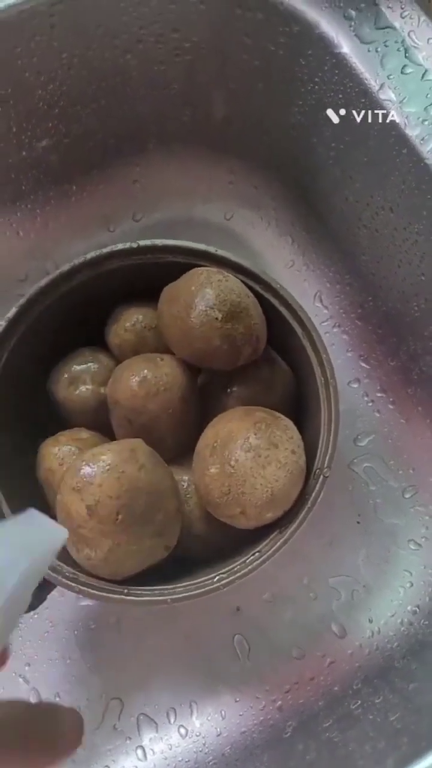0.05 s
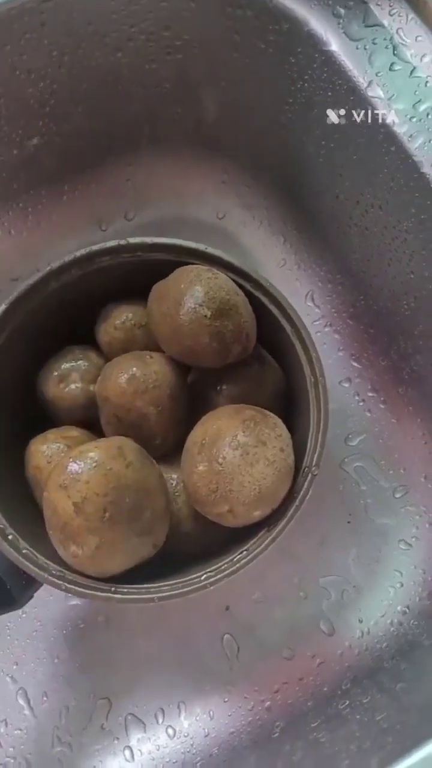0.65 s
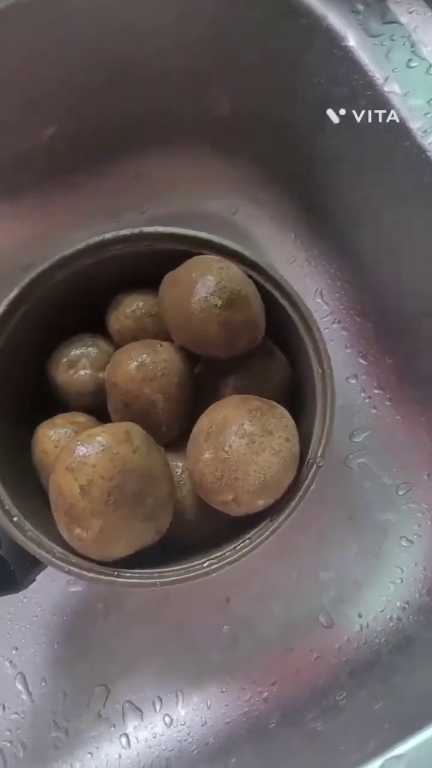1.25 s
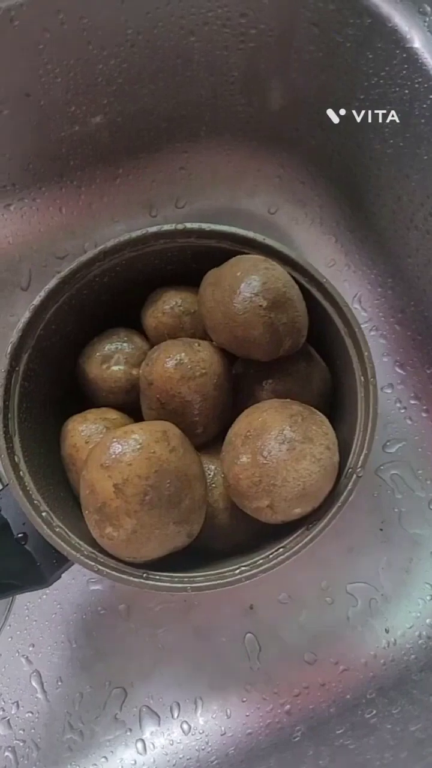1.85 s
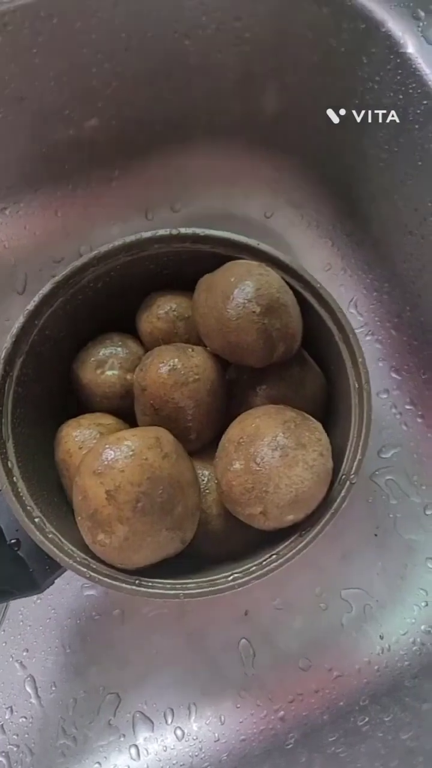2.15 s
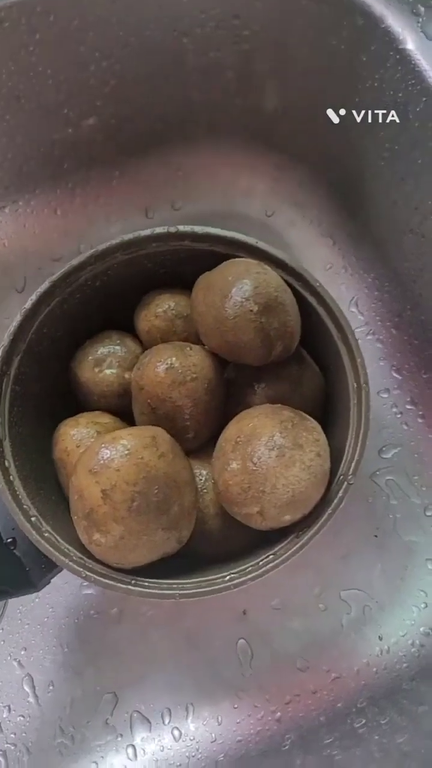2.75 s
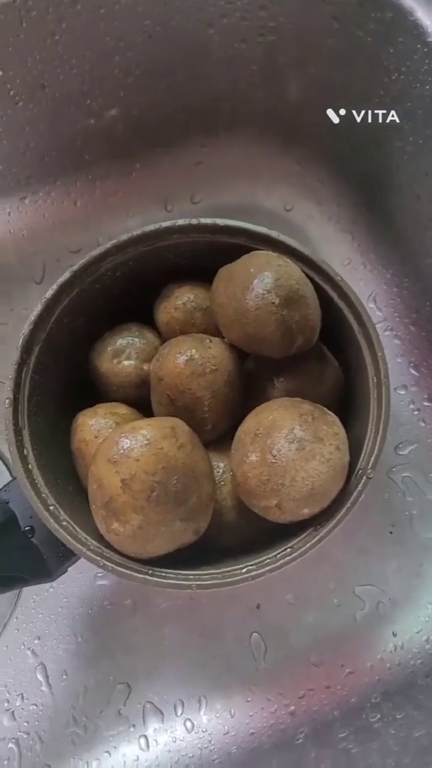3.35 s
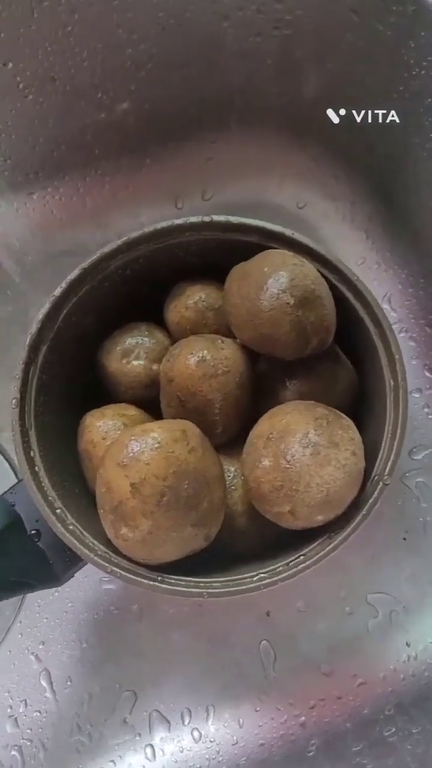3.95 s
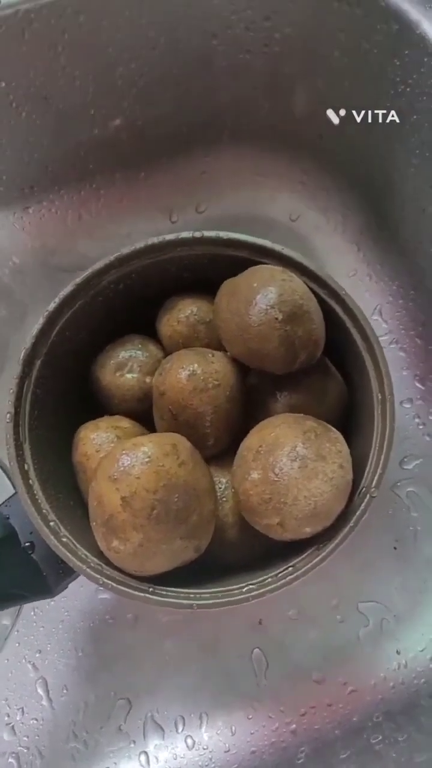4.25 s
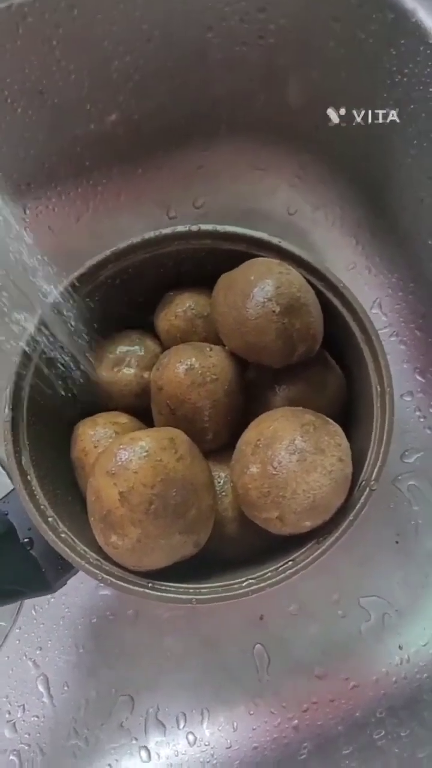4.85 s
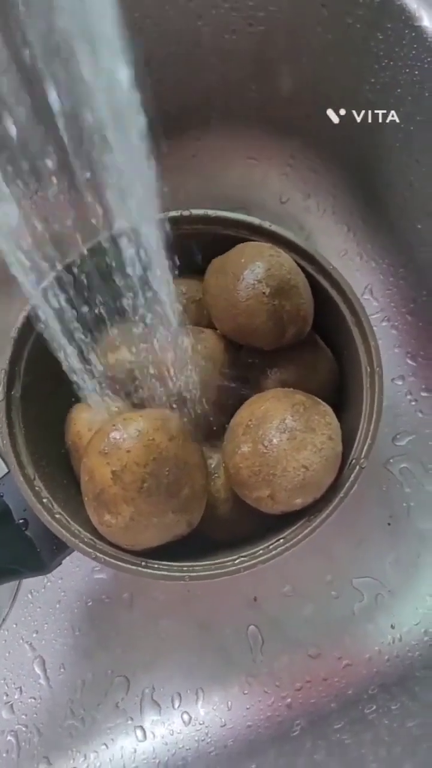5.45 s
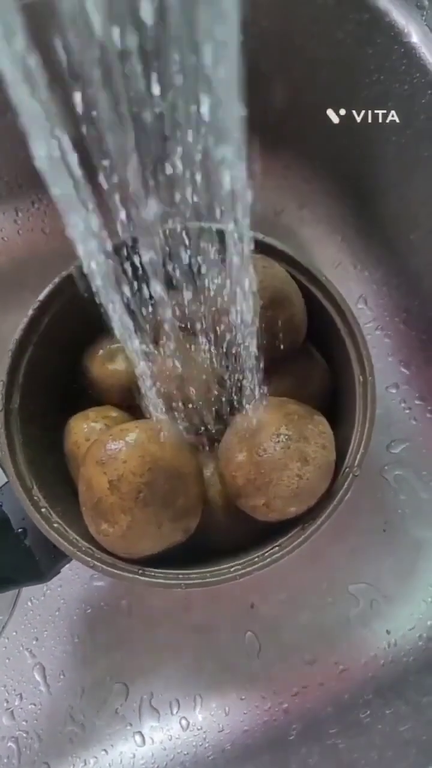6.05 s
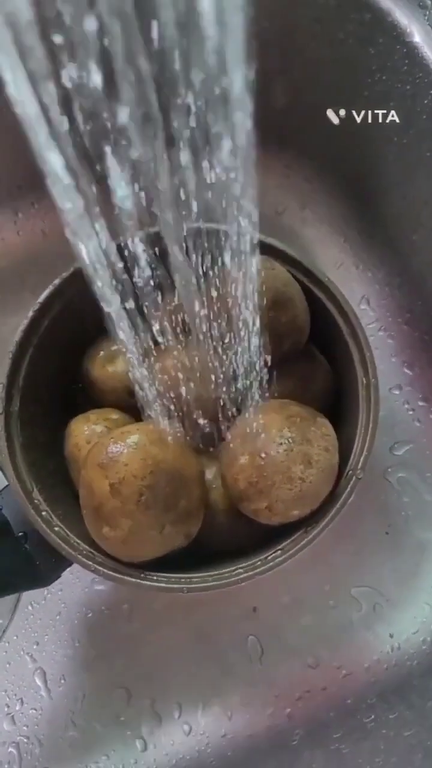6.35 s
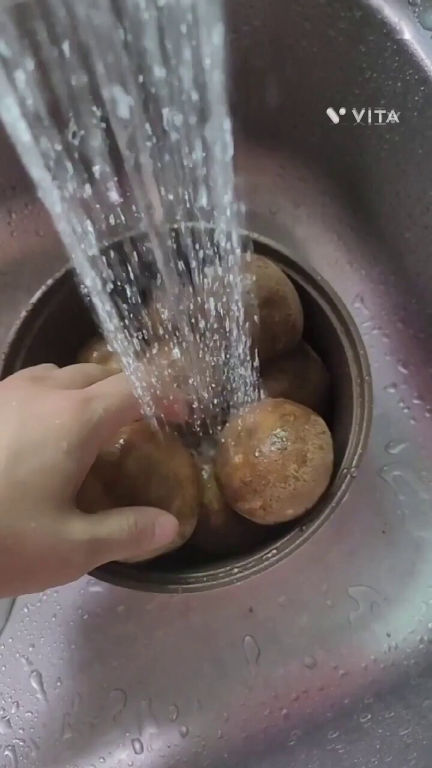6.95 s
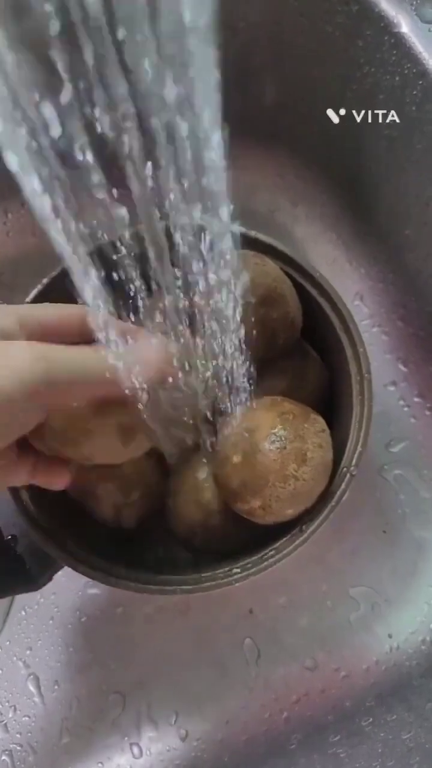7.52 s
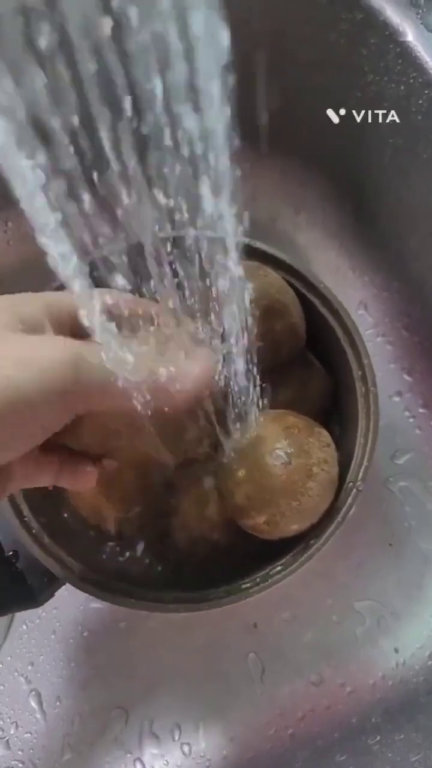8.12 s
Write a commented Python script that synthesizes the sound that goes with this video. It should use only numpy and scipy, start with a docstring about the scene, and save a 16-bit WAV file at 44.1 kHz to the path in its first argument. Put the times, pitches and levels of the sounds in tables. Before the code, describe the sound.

A spray bottle squirts three times and thuds down, then tap water drums on a steel sink and splashes over potatoes in a bowl.

```python
"""Washing potatoes in a steel sink.

A trigger bottle atomises cleaner in three squirts onto potatoes in a bowl and is put down with a thud.
The tap is handled; its jets drive the modes of the sink floor, then swing over to splash into the bowl,
where trapped air resonates as a hand turns and rubs the potatoes. Heard close, in a small kitchen."""
import sys
import numpy as np
from scipy import signal
from scipy.fft import rfft, irfft
from scipy.io import wavfile

SR = 44100
rng = np.random.default_rng(int(sys.argv[2]) if len(sys.argv) > 2 else 0)


def put_to_file(sound):
    """Save the sound as 16-bit audio at rate SR, in the file named by the first command-line argument."""
    columns = np.atleast_2d(sound).T  # one column per channel
    safe = np.clip(columns, -1, 1)
    whole_steps = np.round(safe * 32767)
    wavfile.write(sys.argv[1], SR, whole_steps.astype(np.int16))


N = 360738
TIME = np.arange(N) / SR

# Levels are relative within each layer; t60 is the time taken to decay by 60 dB.
# hiss of the landing jets, softer on potatoes than on steel: (time [s], level [dB])
JET_HISS = [(4.29, -26), (4.43, -27.5), (4.49, -28.5), (4.66, -30.5), (4.86, -27.5), (5.02, -29),
            (5.3, -29.5), (5.7, -32.5), (6.42, -40), (6.8, -37.5), (7.3, -38.5), (8.18, -36.5)]
# splashes where a jet catches a potato or the hand: (time [s], level [dB], spread [s])
THROWN_SPLASHES = [(5.77, -35, .02), (5.87, -43.5, 0.031), (6.03, -33.5, 0.014), (6.08, -35, 0.015),
                   (6.2, -37, 0.023), (6.575, -34, 0.032), (6.79, -36, 0.029), (7.16, -36, 0.0096),
                   (7.34, -34, 0.014), (7.41, -37.5, 0.011), (7.69, -36.5, .02), (7.761, -30.5, 0.011),
                   (7.87, -33.5, 0.03), (8.13, -35.5, 0.03)]
# spits where a jet first strikes or catches an edge: (time [s], level [dB], pitch [Hz], t60 [s])
JET_SPITS = [(4.278, -27, 11700, 0.0062), (4.432, -26.5, 3430, 0.079), (5.644, -36.5, 1380, 0.14),
             (5.716, -37.5, 2840, 0.33), (5.851, -31.5, 7000, .015), (5.899, -29, 7960, 0.02),
             (6.391, -38, 2040, 0.045), (6.492, -36, 3180, 0.034)]
# force of the jets on the sink floor: (time [s], level [dB])
JET_FORCE = [(4.32, -32.5), (4.42, -34.5), (5.186, -35), (5.5, -37.5)]
# slugs of water striking the sink floor: (time [s], level [dB], pitch [Hz])
WATER_SLUGS = [(4.2763, -12, 450), (4.437, -26, 190), (4.555, -30, 418), (4.593, -20, 447),
               (4.727, -19, 420), (4.867, -28.5, 405.6), (4.917, -26, 486), (5.214, -19, 430)]
# modes of the steel sink: (frequency [Hz], level [dB], t60 [s])
SINK_MODES = [(84, -25, 0.17), (171, -21, 0.12), (243, -1, 0.16), (283, -4.5, 0.065), (368, -3, 0.066),
              (401.5, -16, 0.35), (461.7, -15.5, 0.2), (530, -15, 0.054), (620, -10, 0.17),
              (745, -11, 0.09), (830, -7, 0.07), (1065, -6, 0.06), (1920, -17, 0.14)]
# air between the potatoes, retuned by the cupping hand:
# (time [s], level [dB], lower resonance [Hz], upper resonance [Hz])
AIR_GAPS = [(5.5, -41, 840, 1320), (5.85, -51.5, 860, 1280), (6.48, -51.5, 885, 1290),
            (7.04, -36, 995, 1214), (7.3, -34.5, 1006, 1210), (7.55, -39.5, 947, 1146),
            (8.18, -45.5, 960, 1120)]
# water on skins, rim and hand: (time [s], level [dB])
SKIN_WATER = [(5.5, -42.5), (5.73, -46.5), (5.86, -58), (6.55, -46), (7.3, -43), (8.18, -39)]
# pockets of air closing: (time [s], level [dB], pitch [Hz], t60 [s])
AIR_PLOPS = [(6.566, -26.5, 891, 0.091), (6.783, -32.5, 1520, .03), (6.904, -29, 1220, .03),
             (6.938, -30, 1280, .03), (7.006, -23, 1300, 0.04), (7.0135, -22, 1090, 0.039),
             (7.036, -24, 1086, 0.048), (7.072, -30, 1120, 0.036), (7.108, -30.5, 1215, 0.05),
             (7.1735, -24.5, 1170, 0.048), (7.174, -18, 2020, 0.016), (7.23, -26, 1340, 0.03),
             (7.256, -26, 1160, 0.037), (7.3605, -22, 1120, 0.029), (7.413, -28.5, 1217, 0.067),
             (7.414, -28.5, 2135, 0.043), (7.6207, -23.5, 2230, 0.042), (7.709, -30.5, 1104, 0.04),
             (7.777, -30, 2120, 0.12), (7.904, -30.5, 1070, 0.053), (8.103, -24, 2680, 0.068),
             (8.138, -28, 2870, .03), (8.153, -21, 2890, 0.023)]
# potatoes bumping the bowl: (time [s], thud level [dB], knock level [dB])
POTATO_BUMPS = [(7.379, -43, -47), (7.742, -35.5, -52), (7.846, -51, -40.5), (7.905, -37, -41)]
# pump strokes: (time of full flow [s], level [dB], swell [dB/s], hold [s], fine mist offset [dB])
PUMP_STROKES = [(0.005, -36, 904, 0.093, 3), (0.41, -31, 275, 0.045, 3.5), (0.821, -31.5, 283, 0.03, 2.5)]
# liquid and air sucked through the pump: (time [s], level [dB], pitch [Hz], length [s])
PUMP_SQUELCHES = [(0.065, -40.5, 1754, 0.047), (0.441, -39.5, 1740, 0.024), (0.527, -38.5, 1310, 0.014),
                  (0.566, -44, 1510, 0.014), (0.893, -42, 1450, 0.016), (0.938, -42.5, 2480, 0.016)]
# light contacts: (time [s], level [dB], treble tilt [dB/octave], rise [s], t60 [s])
TRIGGER_CLICKS = [(.193, -38, -7, 0.0075, 0.21), (.229, -23.5, -0.5, 0.0068, 0.084),
                  (.366, -41.5, -6, 0.0081, 0.11), (.410, -25.5, 5, 0.0015, 0.033),
                  (.5425, -28.5, -4, 0.0028, 0.085), (.759, -39, -6.5, 0.0062, 0.082),
                  (.778, -37, 20, 0.0074, 0.1), (.9156, -12.5, -0.5, 0.00024, 0.01),
                  (.919, -24, -2, 0.0037, 0.047), (.994, -51.5, -2, .001, 0.28),
                  (1.067, -47.5, -7, 0.0012, 0.087)]  # plastic trigger and pump valve
HANDLING_CLACKS = [(.635, -28, -11.5, 0.0031, 0.051), (1.432, -34.5, -2, 0.00066, 0.075),
                   (1.507, -40, -5, 0.011, 0.23), (1.572, -34, 1, 0.0017, 0.087),
                   (1.694, -39, -1, 0.0035, 0.078), (1.832, -32, 6.5, 0.0042, 0.08),
                   (2.327, -45, -8.5, 0.0083, 0.37), (2.348, -43.5, -7.5, 0.001, 0.26),
                   (2.378, -35.5, 8, 0.00086, 0.12), (2.464, -33, -4, 0.0067, 0.065),
                   (2.512, -44.5, -8, 0.0043, 0.038)]  # things handled around the sink
# blows on the sink, and at 3.65 s a faint rub: (time [s], level [dB], low cutoff [Hz], high cutoff [Hz], rattle
# weight [ratio], rocking time [s])
SINK_BLOWS = [(.636, -13.5, 55, 403, 0.11, 0), (1.505, -30.5, 299, 1840, 1.96, 0),
              (1.512, -28, 175, 597, 1.4, 0), (1.572, -32.5, 179, 860, 0.97, .1),
              (2.326, -33.5, 201, 2170, 1.3, 0), (2.350, -31.5, 160, 600, 0.76, 0),
              (2.370, -34, 186, 400, 0.33, .04), (2.414, -40.5, 400, 1710, 1.2, 0),
              (2.430, -33, 187, 450, 0.38, 0), (2.466, -36.5, 190, 328, .3, 0),
              (3.65, -57.5, 400, 740, 2.6, .04)]
# small hard parts touched: (time [s], level [dB], pitch [Hz], width over pitch [ratio])
PART_TINKS = [(2.1, -46.5, 3700, 0.7), (2.379, -42, 3560, 0.38), (2.416, -39, 1736, 0.062),
              (2.463, -36.5, 3680, 0.15), (2.508, -45, 3070, 0.14)]
# spectra of the sources: (frequency [Hz], level [dB])
SPRAY_SPECTRUM = [(88, -32.5), (150, -5), (291, -1.5), (398, -11), (466, -2.5), (545, -15), (1120, -12),
                  (1310, -3.5), (1450, -5.5), (2870, -10.5), (3700, -10.5), (6770, -2.5), (9260, -4.5),
                  (11700, 3), (16000, 2)]  # droplets of the shower
STEEL_SPECTRUM = [(30, -37), (60, -3), (110, 0.5), (170, -17.5), (230, 5.5), (295, 2), (380, 8.5),
                  (540, 2.5), (630, 5.5), (790, -1.5), (890, -7), (1040, -0.5), (1500, -6.5), (2300, -14),
                  (3300, -24)]  # sink floor under the jets
SPLATTER_SPECTRUM = [(900, -37), (1850, -9.5), (2170, 11.5), (2450, -7.5), (2750, 7.5), (3400, -5.5),
                     (4600, 2.5), (9000, -39)]  # drops on potato skins
WALL_SPECTRUM = [(110, -25), (190, 0.5), (260, -6.5), (370, -13), (470, 0), (560, -12.5), (900, -26)]  # drops on the bowl
BUMP_SPECTRUM = [(60, -24), (200, -23), (330, -18), (470, -2), (700, -5), (1100, -19), (2500, -45)]  # a potato against the bowl
COARSE_MIST_SPECTRUM = [(240, -15), (400, -16.5), (1230, -2.5), (1460, -13), (1730, -6.5), (2470, -7),
                        (3690, -3), (4380, -5.5), (6640, 0), (10500, -8), (12100, 1.5), (13500, -7),
                        (15000, 3), (16000, -12)]  # nozzle throughout a stroke
FINE_MIST_SPECTRUM = [(5000, -34), (10500, -4), (12500, -3), (15000, 5), (16000, -14)]  # nozzle at full pressure
TRIGGER_SPECTRUM = [(300, -17), (750, -11.5), (1200, -0.5), (1700, -6), (2300, 1), (4200, -3.5),
                    (6600, 3.5), (7400, 6), (9200, -3.5), (12300, 6), (15000, 1.5), (16000, -5)]  # plastic pump parts
CLACK_SPECTRUM = [(350, -40), (600, 0), (1030, -8), (1350, 1), (1490, -4.5), (2090, -3.5), (2400, -7.5),
                  (2870, -3.5), (5950, 0), (7830, 6), (9240, -2), (11200, -1), (16000, -9)]  # handled things
RATTLE_SPECTRUM = [(30, -25), (80, 17.5), (160, 19), (250, -0.5), (400, 2.5), (560, -7.5), (850, 1),
                   (1400, -17), (1850, 1.5), (2500, -1.5), (3500, 1.5), (16000, -10)]  # things standing on the sink
HOUSE_SPECTRUM = [(25, -26), (70, -2.5), (108, -10.5), (249, -15), (326, -19), (489, -15.5), (962, -21),
                  (1400, -23.5), (3430, -31), (6050, -25), (9320, -34.5), (16000, -31.5)]  # background noise
# stereo widths: (frequency [Hz], side relative to mid [dB])
WATER_SIDE = [(100, -36), (270, -16), (430, 1), (560, 3.5), (700, -0.5), (880, 9), (1200, 1.5), (1600, 5.5),
              (2150, 1), (2800, 1), (6000, -0.5), (10000, -4.5)]
STEEL_SIDE = [(130, -37), (270, -7), (420, -5), (550, 8), (850, 11), (1050, -1), (2600, 7.5)]
MIST_SIDE = [(130, -10), (500, 3), (800, 3), (1500, 4), (3000, 3), (6000, -1), (12000, -6)]
HANDLING_SIDE = [(130, -16), (250, -13.5), (450, -2), (800, -2.5), (1500, 2), (5000, 0), (12000, -13.5)]
HOUSE_SIDE = [(60, -16), (200, -9), (380, -0.5), (700, 7.5), (1290, 4), (4400, 1.5), (8120, -11),
              (15000, -24)]
# reverberation of the kitchen: (frequency [Hz], t60 [s])
ROOM_DECAY = [(100, 0.23), (500, 0.26), (2000, 0.22), (8000, 0.23), (16000, 0.19)]

TAP_OPEN_S, LAND_S, LEAVE_STEEL_S = 4.149, 4.279, 5.5
BAND_LIMIT_HZ = 16000


def shower():
    """Impact noise: jets hiss in air, then land as clumps of droplets; the parts add in power."""
    fine = drops(per_s=13000, spread_db=3.5, t60=0.014, direct=0.67)
    coarse = drops(per_s=7000, spread_db=4.0, t60=0.015, direct=0.48)
    ringing = gain_of(-4) * pings(low_hz=2503, high_hz=15440, per_s=1200, cycles=1400)
    spatter = gain_of(-8.5) * drops(per_s=500, spread_db=3.5, t60=0.003, direct=1.6)
    on_bowl = np.clip((TIME - 5.0) / 0.92, 0, 1)  # the jets swing from flat steel to round potatoes
    clumps = gain_of((1.45 + 0.3 * on_bowl) * wander(1.2, 19))
    spray = (fine * np.sqrt(1 - on_bowl) + coarse * np.sqrt(on_bowl) + ringing + spatter) * clumps
    spray = colour(flicker(spray, depth_db=3.3, span_hz=280, span_s=0.024), SPRAY_SPECTRUM)
    puff = gain_of(-36.5) * np.exp(-since(TAP_OPEN_S) / 0.03)
    in_air = swell(TAP_OPEN_S, rise_s=0.005) * (gain_of(-39) + puff) * (TIME < LAND_S)
    landed = level(JET_HISS) * landing()
    thrown = sum(gain_of(db) * np.exp(-((TIME - s) / spread) ** 2 / 2)
                 for s, db, spread in THROWN_SPLASHES)
    spray *= np.sqrt(in_air ** 2 + landed ** 2 + thrown ** 2)
    for s, db, hz, t60 in JET_SPITS:
        lead, spit = slap(hz, t60)
        add(spray, s - lead, gain_of(db) * spit)
    return place(spray, WATER_SIDE, pan_db=-1.6 + 2.0 * on_bowl)


def landing(surge_db=4.5, surge_s=0.0081):
    """Onset transient: the first slug of water hits hardest, then the jets run evenly."""
    return swell(LAND_S, rise_s=0.007) * gain_of(surge_db * np.exp(-since(LAND_S) / surge_s))


def pings(low_hz, high_hz, per_s, cycles):
    """Damped oscillation: each droplet rings for 10 ms at a pitch set by its size."""
    length = SR // 100
    t = np.arange(length) / SR
    onset, size, strength, mid_phase, side_phase = rng.random((int(per_s * N / SR), 5)).T[:, :, None]
    hz = low_hz * (high_hz / low_hz) ** size
    envelope = (strength + 0.12) ** -.5 * np.exp(-np.log(1000) * t * hz / cycles) * np.sqrt(hz)
    samples = ((onset * N).astype(int) + np.arange(length)).ravel()
    rings = (envelope * np.sin(2 * np.pi * (hz * t + phase)) for phase in (mid_phase, side_phase))
    return unit_rms(np.array([np.bincount(samples, ring.ravel(), N)[:N] for ring in rings]))


def drumming(leave_db_per_s=142):
    """Forced vibration of a plate: the sink floor roars and rings until the jets swing off it."""
    beats = drops(per_s=1800, spread_db=2.5, t60=0.031, direct=0.79)
    ring = unit_rms(signal.oaconvolve(beats, sink_ring()[:1], axes=1)[:, :N])
    roar = gain_of(1) * colour(beats, STEEL_SPECTRUM) + gain_of(-10) * ring
    force = landing() * level(JET_FORCE) * gain_of(-leave_db_per_s * since(LEAVE_STEEL_S))
    surges = gain_of(1.2 * wander(5.8, 18))
    return place(roar * force * surges, STEEL_SIDE, pan_db=-1.0)


def slugs(ring_db=-13):
    """Impulsive excitation: thick slugs of water briefly dent the sink floor and leave it ringing."""
    out = np.zeros((2, N))
    for s, db, hz in WATER_SLUGS:
        push = thump(hz, rise_s=0.0014)
        ring = signal.oaconvolve(sink_ring(), push[:1], axes=1)
        add(out, s, gain_of(db) * push)
        add(out, s, gain_of(db + ring_db) * ring / abs(ring).max())
    return place(out, STEEL_SIDE, pan_db=-1.0)


def sink_ring(uneven_db=2.0, detune=0.032):
    """Modal superposition: the steel's decaying modes vary with the spot struck and the load."""
    t = np.arange(SR // 2) / SR
    ring = np.zeros((2, len(t)))
    for hz, db, t60 in SINK_MODES:
        weight, shift, lag = rng.uniform(-1.06, 1, 3)
        phase = np.array([[0], [np.sign(lag) * np.pi / 2]])  # side in quadrature with mid
        envelope = gain_of(db + uneven_db * weight - 60 * t / t60)
        ring += envelope * np.sin(2 * np.pi * hz * (1 + detune * shift) * t + phase)
    return ring


def bowl():
    """Impact and resonance: water gurgles between the potatoes, froths on them and drums on the bowl."""
    hollow = cavities()
    hollow += gain_of(-10) * bubbles(low_hz=973, high_hz=1357, per_s=70, cycles=69, count=12)
    skin_drops = drops(per_s=600, spread_db=4.0, t60=0.034, direct=0.67)
    froth = bubbles(low_hz=1950, high_hz=3300, per_s=110, cycles=110, count=18)
    wall_drops = drops(per_s=600, spread_db=5.5, t60=0.0087, direct=0.41)
    splatter = gain_of(-4) * colour(skin_drops, SPLATTER_SPECTRUM) + gain_of(-6) * froth
    splatter += gain_of(-13.5) * colour(wall_drops, WALL_SPECTRUM)
    water = place(hollow * level([row[:2] for row in AIR_GAPS]), WATER_SIDE, pan_db=2.0)
    water += place(splatter * level(SKIN_WATER), WATER_SIDE, pan_db=1.5)
    return water * swell(LEAVE_STEEL_S, rise_s=0.18)


def cavities():
    """Cavity resonance: drops excite two modes of the air between the potatoes."""
    s, _, lower_hz, upper_hz = np.transpose(AIR_GAPS)
    patter = drops(per_s=410, spread_db=4.0, t60=0.03, direct=1.0)
    lower = resonate(patter, np.interp(TIME, s, lower_hz), width_hz=113)
    upper = resonate(patter, np.interp(TIME, s, upper_hz), width_hz=157)
    return gain_of(-11.5) * lower + gain_of(-9.5) * upper


def bubbles(low_hz, high_hz, per_s, cycles, count):
    """Superposition: bubbles of many sizes form at random, each ringing at its own pitch."""
    pitches = np.geomspace(low_hz, high_hz, count) * rng.uniform(1.0, 1.03, count)
    births = [impacts(per_s / count, spread_db=3.8) for _ in pitches]
    rings = [bubble(hz, cycles / hz, glide=0.065) for hz in pitches]
    return unit_rms(sum(signal.oaconvolve(born[None], ring, axes=1)[:, :N]
                        for born, ring in zip(births, rings)))


def bubble(hz, t60, glide):
    """Volume oscillation: a pocket of air rings, decays and rises in pitch."""
    t = np.arange(SR // 8) / SR
    turns = hz * t * (1 + glide * np.minimum(t / t60, 1))
    phase = 2 * np.pi * rng.random() + np.array([[0], [rng.choice([-1, 1]) * np.pi / 2]])  # mid, side
    return gain_of(-60 * t / t60) * (1 - np.exp(-t * hz * 2)) * np.sin(2 * np.pi * turns + phase)


def hand():
    """Air entrapment: a turned potato closes pockets that plop with a wet slap, and bumps the bowl."""
    out = np.zeros((2, N))
    for s, db, hz, t60 in AIR_PLOPS:
        lead, splat = slap(hz, t60)
        add(out, s - lead, gain_of(db - 13) * splat)
        add(out, s, gain_of(db + 1) * bubble(hz, t60, glide=0.047))
    for s, thud_db, knock_db in POTATO_BUMPS:
        lead, knock = burst(rise_s=0.0044, t60=0.16)
        add(out, s - lead, gain_of(knock_db) * colour(knock, BUMP_SPECTRUM))
        add(out, s, gain_of(thud_db) * thump(hz=70, rise_s=0.011))
    return place(out, WATER_SIDE)


def mist(empty_db_per_s=243, fine_fall_s=0.043):
    """Atomisation: the nozzle tears liquid into droplets, finest at full pressure, as the pump empties."""
    flow, pressure = np.zeros(N), np.zeros(N)
    for s, db, swell_db_per_s, hold, fine_db in PUMP_STROKES:
        flow += gain_of(db + swell_db_per_s * np.minimum(TIME - s, 0) - empty_db_per_s * since(s + hold))
        pressure += gain_of(db + fine_db) * swell(s, rise_s=0.0018) * np.exp(-since(s) / fine_fall_s)
    coarse = drops(per_s=20000, spread_db=4.0, t60=0.0093, direct=0.65)
    coarse = colour(flicker(coarse, depth_db=3.8, span_hz=300, span_s=0.021), COARSE_MIST_SPECTRUM)
    fine = colour(drops(per_s=14000, spread_db=4.0, t60=0.0097, direct=0.61), FINE_MIST_SPECTRUM)
    return place(gain_of(-2) * coarse * flow + gain_of(0.5) * fine * pressure, MIST_SIDE)


def squelches(scatter_octaves=0.33, count=8):
    """Bubble resonance: air sucked through the pump rings in quick clusters."""
    out = np.zeros((2, N))
    for s, db, hz, length in PUMP_SQUELCHES:
        pitches = hz * 2 ** (scatter_octaves * rng.permutation(np.linspace(-1, 1, count)))
        delays = length * (np.arange(count) + rng.random(count)) / count
        for delay, pitch in zip(delays, pitches):
            add(out, s + delay, gain_of(db) * bubble(pitch, t60=0.056, glide=0.0054))
    return place(out, HANDLING_SIDE)


def knocks(rock_gap_s=0.041, rock_db_per_s=99, max_rocks=4):
    """Impact and rebound: things strike the sink, and some rock on in softer, weaker blows."""
    out, ring = np.zeros((2, N)), gain_of(-2) * sink_ring()
    for s, db, low_hz, high_hz, rattle_weight, rocking_s in SINK_BLOWS:
        lead, first = blow(ring, low_hz, high_hz, rattle_weight)
        add(out, s - lead, gain_of(db) * first)
        delays = rock_gap_s * (1 + np.arange(max_rocks) + rng.uniform(-0.18, 0.17, max_rocks))
        for delay in delays[delays < rocking_s]:
            lead, again = blow(ring, low_hz, high_hz=580, rattle_weight=0.83)
            add(out, s + delay - lead, gain_of(db - rock_db_per_s * delay) * again)
    return place(out, HANDLING_SIDE)


def blow(ring, low_hz, high_hz, rattle_weight):
    """Contact filtering of ring and rattle: weight reaches the low modes, hardness the high ones."""
    contact = signal.butter(3, [min(low_hz, .8 * high_hz), high_hz], "bandpass", fs=SR)
    lead, noise = burst(rise_s=0.001, t60=0.024)
    rattle = unit_rms(signal.lfilter(*contact, colour(noise, RATTLE_SPECTRUM)))
    out = np.zeros((2, SR))
    add(out, 0, rattle_weight * gain_of(-18) * rattle)
    add(out, lead, signal.lfilter(*contact, ring))
    return lead, out


def clicks(contacts, spectrum, pan_db):
    """Source and filter: short scrapes end in a snap, coloured by the part that is struck."""
    out = np.zeros((2, N))
    for s, db, tilt_db, rise_s, t60 in contacts:
        lead, snap = burst(rise_s, t60)
        add(out, s - lead, gain_of(db) * colour(snap, spectrum, tilt_db))
    return place(out, HANDLING_SIDE, pan_db)


def tinks():
    """Free vibration: small hard parts ring briefly in one resonance when touched."""
    out = np.zeros((2, N))
    for s, db, hz, width in PART_TINKS:
        lead, noise = burst(rise_s=0.0011, t60=0.053)
        peak = [(hz / 2, -40), (hz / (1 + width), -18), (hz, 0), (hz * (1 + width), -18), (hz * 2, -40)]
        add(out, s - lead, gain_of(db) * colour(noise, peak))
    return place(out, HANDLING_SIDE)


def kitchen(x):
    """Reverberation: a short diffuse tail, each band decaying at its own rate."""
    hz, t, bands = signal.stft(rng.standard_normal((2, SR // 2)), SR, nperseg=256)
    envelope = gain_of(-60 * t / curve_at(ROOM_DECAY, hz)[:, None]) * (1 - np.exp(-t / 0.00048))
    tail = place(signal.istft(bands * envelope, SR, nperseg=256)[1], HANDLING_SIDE)
    return signal.fftconvolve(x, tail / np.linalg.norm(tail[0]), axes=1)[:, :N]


def background():
    """Stationary noise: the steady low sound of the house."""
    return gain_of(-59) * place(colour(rng.standard_normal((2, N)), HOUSE_SPECTRUM), HOUSE_SIDE)


def impacts(per_s, spread_db):
    """Shot noise: random impulses, many small and a few large."""
    return (rng.random(N) < per_s / SR) * gain_of(spread_db * np.minimum(rng.exponential(1, N), 4.5))


def drops(per_s, spread_db, t60, direct):
    """Scattering: each drop gives a direct snap, then brief reflections off the sink walls."""
    hits = impacts(per_s, spread_db)
    retained = gain_of(-120 / (t60 * SR))  # share of energy left after one sample
    energy = signal.lfilter([1 - retained], [1, -retained], hits ** 2)
    scatter = np.sqrt(energy) * rng.standard_normal((2, N))
    return unit_rms(direct * hits * rng.choice([-1, 1], (2, N)) + scatter)


def burst(rise_s, t60, lead=0.05):
    """Exponential growth and decay of noise; returns the seconds before its peak, and the sound."""
    t = np.arange(SR // 3) / SR - lead
    envelope = np.exp(np.minimum(t, 0) / rise_s) * gain_of(-60 * np.maximum(t, 0) / t60)
    return lead, envelope * rng.standard_normal((2, len(t)))


def slap(hz, t60):
    """Broad resonance: a sharp burst in one wide band makes a wet slap."""
    lead, noise = burst(rise_s=0.00026, t60=t60)
    return lead, colour(noise, [(hz / 3, -30), (hz / 1.3, -8), (hz, 0), (hz * 1.3, -8), (hz * 3, -30)])


def thump(hz, rise_s):
    """Heavy damping: a soft push gives a few swings, in the mid channel alone."""
    t = np.arange(SR // 4) / SR
    return t / rise_s * np.exp(1 - t / rise_s) * np.sin(2 * np.pi * hz * t) * np.array([[1], [0]])


def resonate(x, hz, width_hz):
    """Heterodyne filtering: a steep resonance follows a pitch curve."""
    carrier = np.exp(2j * np.pi * np.cumsum(hz) / SR)
    pole = np.exp(-np.pi * width_hz / SR)
    return unit_rms((carrier * signal.lfilter([1], np.poly([pole, pole]), x / carrier)).real)


def flicker(x, depth_db, span_hz, span_s):
    """Spectral modulation: the colour shifts at random, in patches of this width and length."""
    frames = dict(fs=SR, nperseg=512, noverlap=384)
    bands = signal.stft(x, **frames)[2]
    field = rng.standard_normal(bands.shape[1:])
    for axis, steps in enumerate([span_hz * 512 / SR, span_s * SR / 128]):
        window = np.expand_dims(signal.windows.gaussian(61, steps / 2), 1 - axis)
        field = signal.oaconvolve(field, window, "same")
    bands *= gain_of(depth_db * np.minimum(unit_rms(field), 1.5))
    return unit_rms(signal.istft(bands, **frames)[1][:, :N])


def wander(low_hz, high_hz):
    """Band-limited noise: a random drift of unit size between these rates."""
    hz = np.fft.rfftfreq(N, 1 / SR) + 1e-9
    spectrum = rfft(rng.standard_normal(N)) / (1 + (hz / high_hz) ** 2) / (1 + (low_hz / hz) ** 2)
    return unit_rms(irfft(spectrum, N))


def colour(x, spectrum, tilt_db=0, keep_power=True):
    """Minimum-phase filtering to a spectrum, tilted by tilt_db per octave above 1200 Hz."""
    hz = abs(np.fft.fftfreq(4096, 1 / SR))
    gain = gain_of(curve_at(spectrum, hz) + tilt_db * np.log2(np.clip(hz, 1200, None) / SR))
    if keep_power:  # of white noise
        gain = unit_rms(gain * np.where(hz < BAND_LIMIT_HZ + 500, 1, .03))
    response = np.exp(np.conj(signal.hilbert(np.log(gain + 1e-6))))
    taps = np.fft.ifft(response).real[:len(hz) // 2]
    return signal.oaconvolve(x, taps.reshape((1,) * (x.ndim - 1) + (-1,)), axes=-1)[..., :x.shape[-1]]


def place(pair, width, pan_db=0):
    """Sum and difference: mid and side become left and right; positive pan favours the left."""
    mid, side = pair[0], colour(pair[1], width, keep_power=False)
    return np.array([(mid + side) * gain_of(pan_db / 2), (mid - side) * gain_of(-pan_db / 2)])


def curve_at(points, hz):
    """Linear interpolation over log frequency."""
    known_hz, values = np.transpose(points)
    return np.interp(np.log(hz + 1), np.log(np.sort(known_hz) + 1), values)


def level(rows):
    """Amplitude envelope from a dB curve, holding its end values."""
    s, db = np.transpose(rows)
    return gain_of(np.interp(TIME, np.sort(s), db))


def swell(s, rise_s):
    """Exponential growth that reaches 1 at time s and stays there."""
    return np.exp(np.minimum(TIME - s, 0) / rise_s)


def since(s):
    """Seconds elapsed since time s, zero before it."""
    return np.maximum(TIME - s, 0)


def add(mix, s, sound):
    """Superposition of a sound on the mix from time s."""
    part = mix[:, max(round(s * SR), 0):][:, :sound.shape[1]]
    part += sound[:, :part.shape[1]]


def gain_of(db):
    """Amplitude ratio of a level in decibels."""
    return 10 ** (np.asarray(db) / 20)


def unit_rms(x):
    """Normalisation to unit mean power."""
    return x / np.sqrt(np.mean(x ** 2) + 1e-20)


def scene():
    """Superposition of direct sound, reverberation and background noise."""
    bottle = mist() + squelches() + clicks(TRIGGER_CLICKS, TRIGGER_SPECTRUM, pan_db=-1.0)
    clacks = clicks(HANDLING_CLACKS, CLACK_SPECTRUM, pan_db=-2.0) + tinks()
    blows = knocks()
    water = shower() + drumming() + slugs() + bowl()
    potatoes = hand()
    to_room = gain_of(-11.5) * bottle + gain_of(-6.5) * clacks + gain_of(-4) * blows
    to_room += gain_of(-8) * water + gain_of(-16) * potatoes
    return bottle + clacks + blows + water + potatoes + kitchen(to_room) + background()


def record(dry):
    """Band limiting: a steep low-pass filter removes the highest treble."""
    taps = signal.firwin(511, BAND_LIMIT_HZ, window=("kaiser", 9), fs=SR)
    return signal.oaconvolve(dry, taps[None], "same")


dry = scene()
out = record(dry)
put_to_file(out)
```